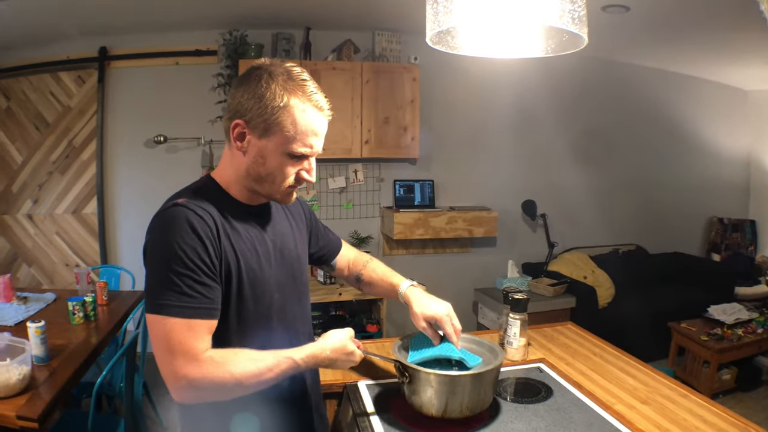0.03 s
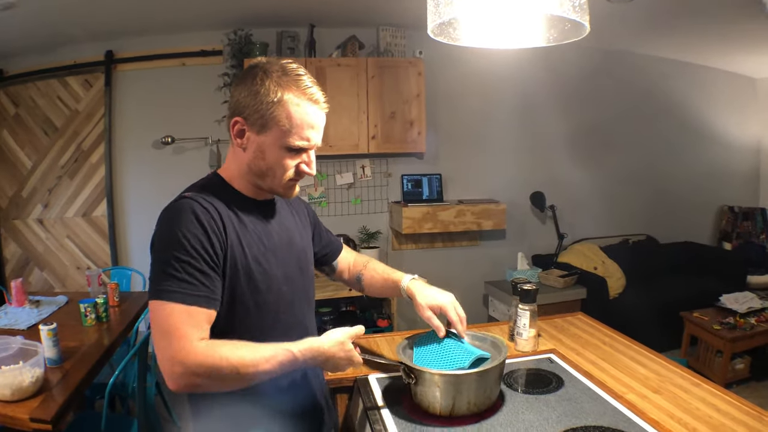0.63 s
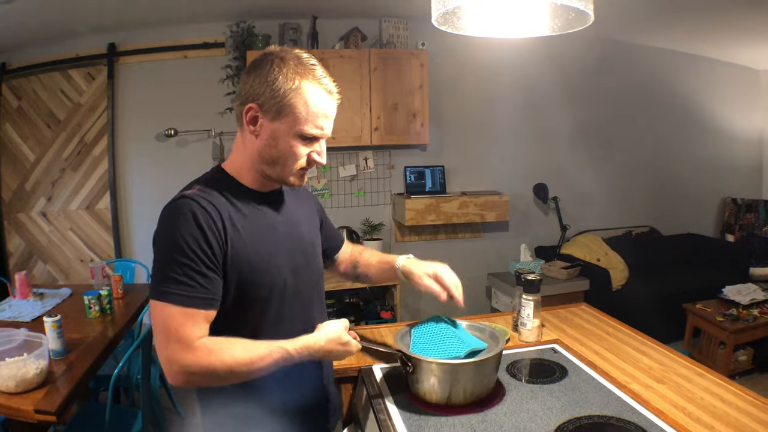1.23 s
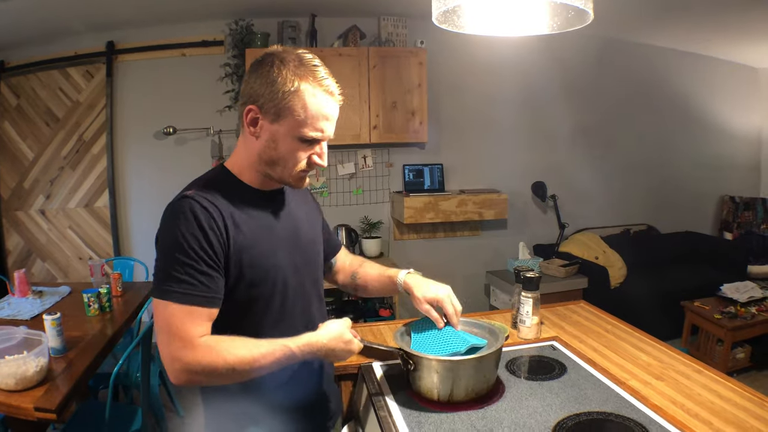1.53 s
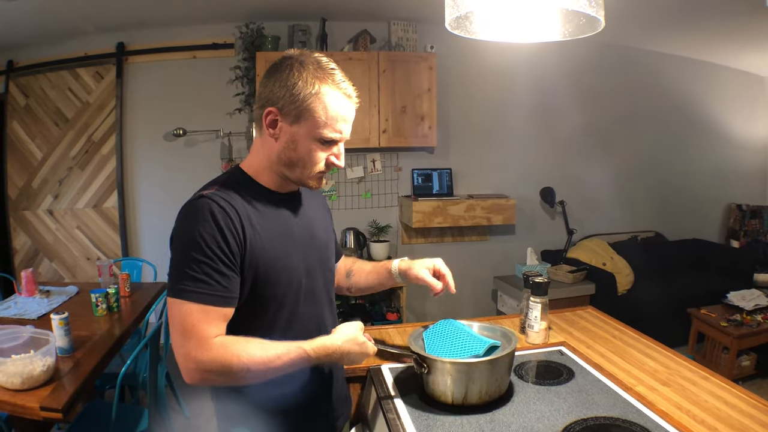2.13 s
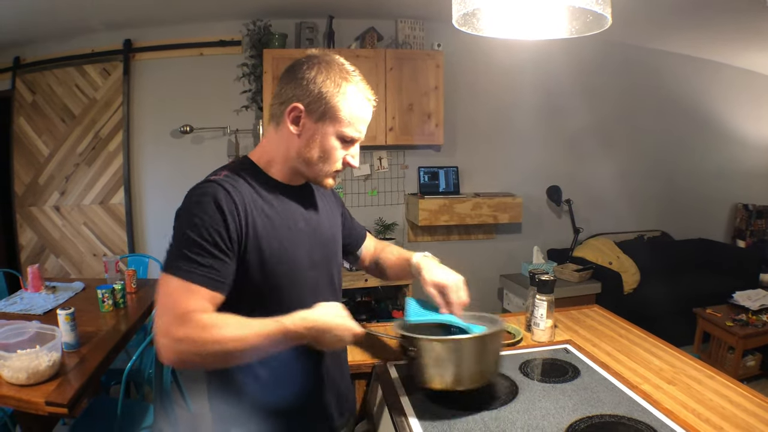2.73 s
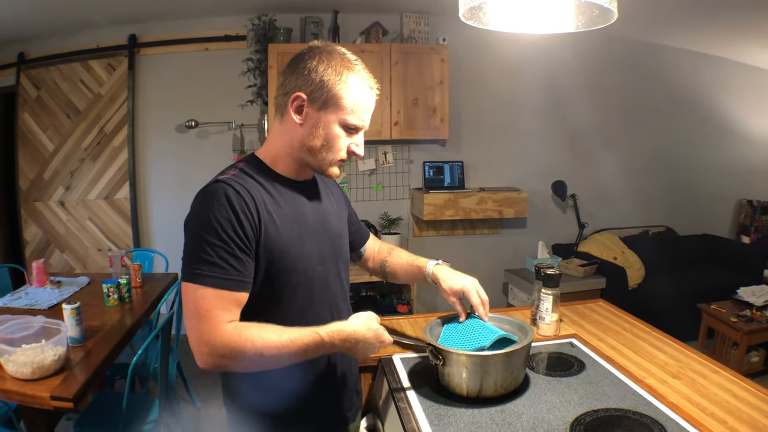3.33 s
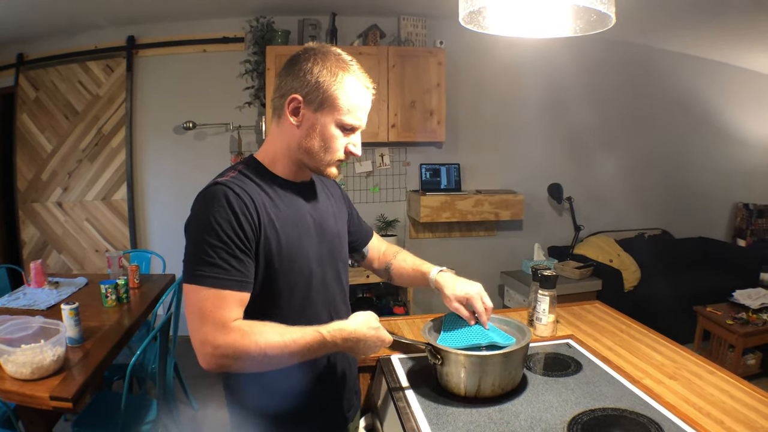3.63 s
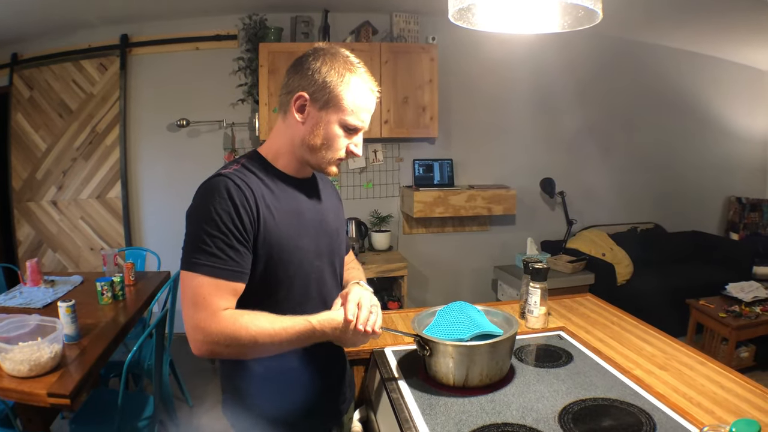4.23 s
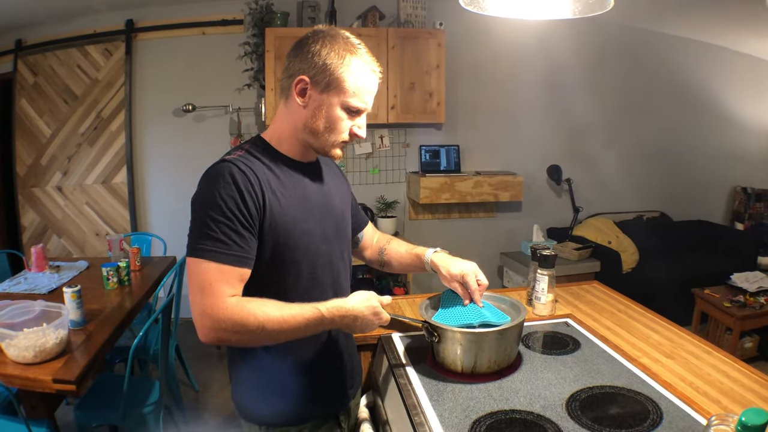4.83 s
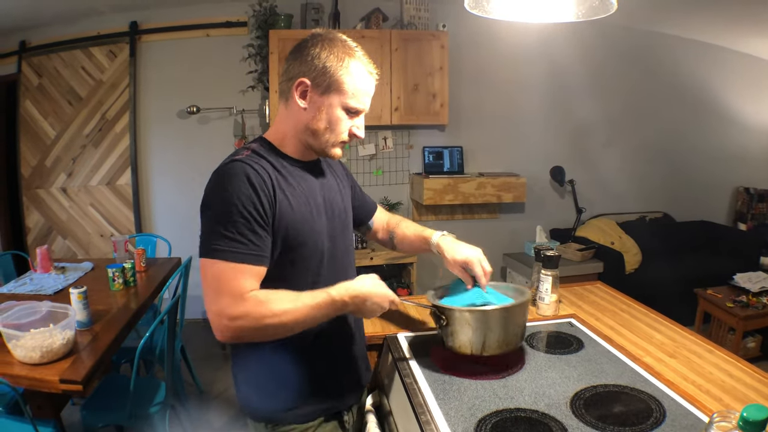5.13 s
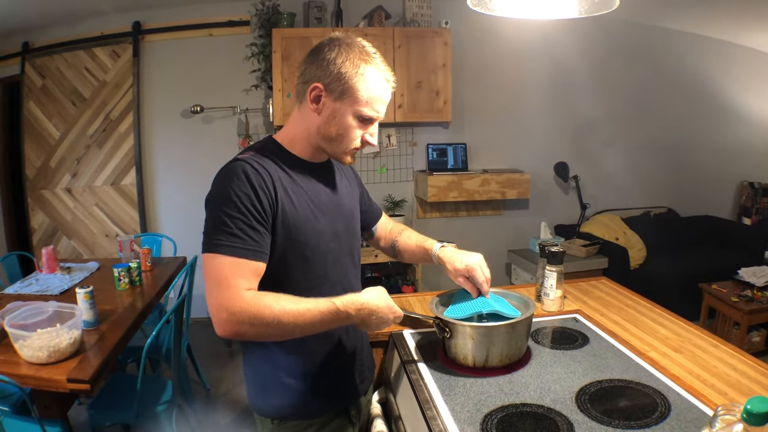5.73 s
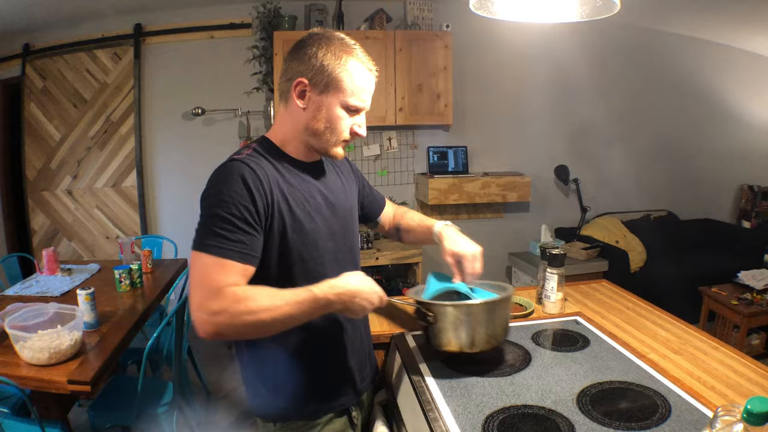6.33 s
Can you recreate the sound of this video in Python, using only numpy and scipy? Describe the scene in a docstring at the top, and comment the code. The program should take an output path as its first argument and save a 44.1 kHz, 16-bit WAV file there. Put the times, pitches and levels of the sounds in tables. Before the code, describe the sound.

Popcorn pops in a covered steel pot in a home kitchen, a rapid, irregular crackle of short snaps and soft puffs lasting the whole six and a half seconds. In the first 0.3 seconds a cluster of dull blows, the loudest moment, booms in the pot and rumbles the stove. Weaker thuds come at about 1.2 and 3 seconds. The pot is shaken roughly once a second, its base rasping over the glass top. The lid clanks brightly with the shakes from 0.8 to 1 second, from 1.7 to 2.1, around 2.9, and once more lightly near 3.9. Softer scrapes without clanks follow at about 5.1 and from 6.1 seconds to the end. Beneath the popping, oil sizzles faintly, split hulls sputter steam and the heap of corn rustles, over a steady low rumble of the house.

```python
"""Popcorn pops in a covered steel pot on a glass stove top in a home kitchen.
Each kernel tears open with a short crackle and a puff of steam that rings the air under the lid.
The pot is shaken about once a second: it scrapes and the lid clanks. A few dull blows boom in the pot
and rumble the stove's frame. Pops, blows and strokes stir the corn over the sizzling oil;
split hulls leak steam, the heap rustles, and the house rumbles low throughout."""
import sys
import numpy as np
from scipy import signal
from scipy.fft import rfft, irfft
from scipy.io import wavfile
from scipy.ndimage import uniform_filter1d

SR = 44100
rng = np.random.default_rng(int(sys.argv[2]) if len(sys.argv) > 2 else 0)


def persist_wave(psi):
    """Save psi, clipped to +-1, as 16-bit WAV."""
    counts = np.round(np.clip(psi, -1, 1) * 32767).astype(np.int16)
    wavfile.write(sys.argv[1], SR, np.atleast_2d(counts).T)


N = 285761
T = np.arange(8192) / SR  # time axis of one event, s
LEAD_S = .006  # tear before a pop, grind before a clank

# kernel bursts: t/s, crack/dB, treble re crack/dB, puff/dB, knock f/Hz
POPS = [(0.1532, -50, -5, -36, 1120), (0.1725, -51, 6, -32.5, 2500), (0.2705, -44.5, -11, -37, 980),
        (0.3178, -43.5, -11.5, -31, 1130), (0.382, -45.5, -4, -34.5, 2170), (0.4141, -38, -12, -33, 1120),
        (.473, -47.5, -16, -55, 3230), (0.5493, -46, -14, -36.5, 1170), (.609, -43.5, -9.5, -39.5, 1290),
        (0.647, -49, -15, -78, 1284), (0.6963, -57, -8, -43, 1670), (0.761, -45.5, -26, -40, 1500),
        (0.795, -41, -15, -33.5, 3660), (0.8732, -36, -23, -37, 1590), (1.0141, -42, -17, -37, 1260),
        (1.0442, -50, -12, -64, 1240), (1.111, -53.5, -8, -43, 1970), (1.1439, -47, -9.5, -42.5, 1360),
        (1.211, -51.5, -3.5, -41, 2540), (1.2835, -46.5, -10.5, -41.5, 1360),
        (1.3281, -52.5, -2.5, -45, 1190), (1.4217, -45, -13, -35.5, 1280), (1.452, -47.5, -12, -41, 3430),
        (1.468, -49, -12, -43, 3240), (1.4893, -47, -12, -41, 1280), (1.5259, -58, -10, -37.5, 2560),
        (1.564, -57, -8, -52, 1300), (1.5945, -47.5, -6, -40.5, 2880), (1.6341, -45.5, -15, -39.5, 1000),
        (1.6497, -51, -9, -37.5, 1530), (1.873, -48, -16, -36.5, 1410), (1.996, -51, -5, -33.5, 1100),
        (2.021, -49, -16, -44, 1500), (2.079, -57, -6, -44, 2600), (2.0919, -45, -16, -38.5, 2900),
        (2.153, -57, -4.5, -59, 2710), (2.178, -53, -6.5, -38.5, 2770), (2.2375, -53.5, -20, -47, 1070),
        (2.258, -51.5, -9, -37.5, 2720), (2.299, -48, -11.5, -40.5, 1300), (2.3234, -52, -14, -44, 3470),
        (2.3394, -50.5, -6, -47, 3380), (2.365, -47.5, -10, -41.5, 1330), (2.431, -53, -5, -45, 1700),
        (2.5156, -47.5, -17, -45, 1560), (2.5329, -43.5, -19, -46.5, 1146), (2.595, -53.5, -10, -42, 1820),
        (2.627, -46, -11, -36.5, 2570), (2.656, -59, -12, -47, 1510), (2.7037, -42.5, -15, -40, 1710),
        (2.726, -44.5, -14, -41, 1190), (2.744, -49.5, -8, -40, 1510), (2.7628, -47, -15, -43, 1270),
        (2.789, -40, -13, -36.5, 1640), (2.808, -55, -1, -40.5, 2580), (2.855, -40, -19, -40, 1520),
        (2.922, -41, -18, -35.5, 1310), (3.0, -51, -11, -51, 2320), (3.041, -44, -16, -41, 970),
        (3.063, -48, -11, -46, 3500), (3.0832, -50.5, -7, -61, 3050), (3.1095, -49, -24, -37, 2750),
        (3.1216, -51, -2.5, -42, 2170), (3.145, -57, -35, -54, 1340), (3.187, -48, -3.5, -42.5, 3250),
        (3.29, -53, -12, -39.5, 1250), (3.306, -39.5, -16, -40, 1270), (3.343, -53, -4.5, -39, 3370),
        (3.3737, -62, 2, -43, 3240), (3.399, -57, -7, -43.5, 2860), (3.408, -48, -8, -43, 1160),
        (3.4371, -53, -1, -70, 2650), (3.4997, -49.5, -7.5, -38.5, 2900), (3.538, -49.5, -8, -37.5, 2700),
        (3.5514, -48, -8, -36, 1160), (3.601, -57, -4, -40.5, 1410), (3.6196, -54.5, -10, -44.5, 2120),
        (3.6747, -46.5, -14, -46, 1470), (3.771, -57, -8, -48, 1230), (3.8343, -45, -29, -41, 1560),
        (3.9088, -54.5, -9, -54, 1220), (3.942, -50.5, -11, -39, 1440), (3.993, -61.5, 2, -66, 1900),
        (4.0093, -51, -4, -38.5, 3200), (4.025, -52.5, -27, -37.5, 2520), (4.0746, -49, -10, -39.5, 2060),
        (4.098, -50, -7, -38, 2470), (4.128, -50.5, -7, -48, 1720), (4.15, -46, -6, -42.5, 2830),
        (4.1898, -55, -26, -45, 1830), (4.206, -54.5, -12, -57, 2870), (4.3197, -50.5, -12, -42.5, 3230),
        (4.3426, -49, -10.5, -43, 1190), (4.3718, -56.5, -5, -39.5, 3250), (4.444, -50, -13, -40, 1280),
        (4.4769, -45.5, -9, -40.5, 1330), (4.5006, -45, -11, -40, 3070), (4.5505, -56, -9, -49, 2300),
        (4.6, -45, -11, -37.5, 1270), (4.618, -48, -14, -44, 2900), (4.644, -54, -10, -55, 2820),
        (4.6727, -53, -10, -41.5, 1410), (4.7012, -51, -8, -40, 3050), (4.728, -54.5, -12, -43, 1200),
        (4.7776, -45.5, -16, -39.5, 1280), (4.8121, -48, -15, -46, 1160), (4.833, -52, -11, -43, 1140),
        (4.85, -55, -10, -43.5, 1610), (4.912, -50.5, -13, -42.5, 2610), (4.9657, -52.5, -2.5, -50, 2750),
        (5.0528, -53, -4.5, -49, 3260), (5.095, -44.5, -11, -38.5, 1550), (5.1664, -46, -19, -44.5, 3070),
        (5.199, -59.5, -2, -47, 1260), (5.265, -54, -15, -39.5, 1310), (5.3606, -48, -6.5, -39, 1950),
        (5.397, -45.5, -21, -39.5, 1070), (5.4222, -57.5, 1, -42.5, 1820), (5.4297, -46, -12, -37.5, 2200),
        (5.488, -54, -3.5, -42.5, 1470), (5.5011, -46.5, -23, -49, 1900), (5.537, -45.5, -19, -36.5, 1150),
        (5.557, -58, -14, -47, 2820), (5.569, -52, -12, -45, 3080), (5.6158, -45, -26, -39.5, 1100),
        (5.65, -52.5, -9, -47, 2920), (5.7195, -51.5, -9.5, -41, 1290), (5.7462, -57.5, -12, -52, 2840),
        (5.79, -53.5, 1, -55, 3300), (5.806, -40, -17, -35, 1360), (5.8523, -49, -15, -48, 1280),
        (5.9037, -47.5, -14, -42.5, 1270), (5.9704, -55.5, -7, -45, 1860), (6.0028, -51, -5, -44, 2890),
        (6.0698, -48.5, -11, -37.5, 1240), (6.0889, -55.5, -6, -45, 1380), (6.1773, -49, -13, -49, 910),
        (6.204, -52, -19, -51, 1600), (6.2206, -60.5, 2, -43, 1280), (6.2536, -48, -15, -38.5, 1600),
        (6.3902, -46.5, -11, -38, 3920), (6.418, -53, -9, -39, 2300), (6.449, -53, -1.5, -49, 3660)]
# dull blows under the lid: t/s, crack/dB, treble re crack/dB, boom/dB, body/dB, body f/Hz
THUDS = [(0.0436, -38.5, -15, -29.5, -36, 410), (0.0523, -25.5, -13.5, -16, -22, 470),
         (.082, -36.5, -16, -24, -51, 775), (0.212, -43, -11, -25.5, -32.5, 626),
         (0.253, -42, -7, -27, -41, 497), (1.2268, -34, -20, -33, -35, 566),
         (3.028, -42.5, -13.5, -35.5, -37.5, 550)]
# pushes and pulls of the pot: peak t/s, length/s, level/dB
STROKES = [(0.823, 0.16, -40), (0.911, 0.39, -41.5), (1.085, 0.15, -49), (1.679, 0.19, -39.5),
           (1.82, 0.11, -37), (1.929, 0.22, -42), (2.058, 0.062, -41.5), (2.787, 0.33, -42.5),
           (2.943, 0.25, -44.5), (3.851, 0.13, -44), (5.102, 0.078, -43), (5.163, 0.064, -50),
           (5.265, .08, -46), (6.104, 0.057, -47), (6.229, 0.19, -49.5), (6.428, 0.25, -51)]
# spectra of hull crack, steam fizz, air puff and steel scrape: f/Hz, level/dB
CRACK = [(200, -50.5), (420, -2.5), (560, -16), (720, -12.5), (830, -6), (950, -2.5), (1200, 3.5),
         (1600, 0), (2100, -1), (2750, -1), (3400, 0), (4400, -9), (5600, -25), (8000, -58.5)]
FIZZ = [(3000, -9), (5200, 3), (6600, 3), (7300, 2), (8100, -0.5), (9800, -2), (11500, -4), (12600, -9.5),
        (14500, -10), (16000, -30)]
PUFF = [(40, -57), (110, -12.5), (180, -2), (245, 1), (320, -4), (400, -17), (600, -25), (1200, -63)]
SCRAPE = [(250, -26), (480, -4.5), (650, -4.5), (810, 6.5), (950, -7.5), (1080, -13.5), (1400, -5),
          (1570, -11), (1850, -8), (2300, -8), (2900, -28), (3450, -22), (4400, -24), (9000, -69)]


def amp(db):
    """Decibels to gain."""
    return 10 ** (np.asarray(db) / 20)


def unit(x):
    """Scale to rms 1."""
    return x / np.sqrt(np.mean(x ** 2) + 1e-20)


def struck(x, db, attack_s=.01):
    """Scale a blow so its attack has the given rms level."""
    return x * amp(db) / np.sqrt(np.mean(x[:int(attack_s * SR)] ** 2) + 1e-20)


def read(points, hz):
    """Interpolate a table over log frequency."""
    f, value = np.transpose(points)
    return np.interp(np.log(hz + 1), np.log(f + 1), value)


def add(mix, s, sound):
    """Mix a sound in at s seconds."""
    part = mix[max(round(s * SR), 0):][:len(sound)]
    part += sound[:len(part)]


def colour(x, spectrum, size=2048):
    """Minimum-phase filter along the last axis."""
    log_gain = np.log(amp(read(spectrum, abs(np.fft.fftfreq(size, 1 / SR)))))
    taps = np.fft.ifft(np.exp(np.conj(signal.hilbert(log_gain)))).real
    taps = taps.reshape((1,) * (x.ndim - 1) + (-1,))
    return signal.fftconvolve(x, taps, axes=-1)[..., :x.shape[-1]]


def highpass(x, hz):
    """Second-order low cut."""
    return signal.sosfilt(signal.butter(2, hz, "highpass", fs=SR, output="sos"), x)


def grains(per_s, spread_db):
    """Random train of tiny clicks of uneven size."""
    size = amp(spread_db * np.minimum(rng.exponential(1, N), 4))
    return unit(size * rng.standard_normal(N) * (rng.random(N) < per_s / SR))


def clumped(x, clump_db, size=130):
    """Break a hiss into snaps about size samples long."""
    lumps = uniform_filter1d(uniform_filter1d(rng.standard_normal(x.shape), size), size)
    return x * amp(clump_db * np.clip(unit(lumps), -2, 2))


def swells(rows):
    """Envelope of Hann bumps; rows: peak t/s, length/s, level/dB."""
    out = np.zeros(N)
    for s, length_s, db in rows:
        add(out, s - length_s / 2, amp(db) * np.hanning(int(length_s * SR)))
    return out


def hollow(x, hz, width_hz):
    """One short resonance of a gap in the corn or a slit in a hull."""
    return signal.fftconvolve(x, np.sin(2 * np.pi * hz * T) * np.exp(-np.pi * width_hz * T))[:len(x)]


def house_rumble(level_db=-49):
    """Low steady background of the house."""
    # background spectrum: f/Hz, level/dB
    spectrum = [(10, -9), (25, -7.5), (42, -0.5), (62, -9.5), (100, -14.5), (200, -18), (400, -26),
                (1000, -34), (4000, -46.5), (16000, -72)]
    gain = amp(read(spectrum, np.fft.rfftfreq(N, 1 / SR)))
    return amp(level_db) * unit(irfft(rfft(rng.standard_normal(N)) * gain, N))


def stirred(jolts, stir_db, settle_s):
    """Power of the corn's motion: jumps at each jolt (t/s, level/dB), then decays."""
    kicks = np.zeros(N)
    for s, db in jolts:
        add(kicks, s, amp([db + stir_db]) ** 2)
    return signal.lfilter([1], [1, -np.exp(-2 / (settle_s * SR))], kicks)


def simmer(oil_db=-73, sizzle_db=2, fizz_db=-14, murmur_db=2.5, tick_s=.0025):
    """Oil spits steadily; jolted corn ticks against the wall and stirs the air in the pot."""
    by_pops = stirred([(s, db) for s, db, *_ in POPS], stir_db=-5.5, settle_s=.018)
    by_strokes = stirred([(s, db) for s, _, db in STROKES], stir_db=-11, settle_s=.02)
    by_thuds = stirred([(s, db) for s, _, _, db, _, _ in THUDS], stir_db=-30.5, settle_s=.17)
    motion = np.sqrt(amp(oil_db) ** 2 + by_pops + by_strokes + by_thuds)
    tick_power = signal.fftconvolve(grains(per_s=1100, spread_db=1) ** 2, np.exp(-T / tick_s))[:N]
    ticks = np.sqrt(abs(tick_power)) * rng.standard_normal(N)
    sizzle = amp(sizzle_db) * unit(colour(ticks, CRACK))
    fizz = amp(fizz_db) * unit(colour(clumped(ticks, clump_db=1.5), FIZZ))
    murmur = amp(murmur_db) * unit(colour(grains(per_s=400, spread_db=1), PUFF))
    return motion * (sizzle + fizz + murmur)


def slumps(gain_db=-6, squeak_db=-2):
    """The heap slumps: dry flakes rub over each other."""
    # rustles of the heap: peak t/s, length/s, level/dB
    rustles = [(.03, .06, -57), (.2, 0.35, -56), (.44, 0.38, -50.5), (1.52, 0.36, -55.5), (2.33, 1, -58),
               (3.39, 0.37, -61.5), (4.15, 0.23, -56.5), (4.37, 0.12, -53.5), (4.67, 0.27, -54)]
    rub = colour(grains(per_s=1200, spread_db=-6.5), CRACK)
    squeak = amp(squeak_db) * unit(hollow(rub, hz=3200, width_hz=900))
    return swells(rustles) * amp(gain_db) * (unit(rub) + squeak)


def cracks(count, fall_s, tail_db, tail_s, spiky):
    """A few sharp hull cracks, then weak scatter among the corn; one row per event."""
    noise, size = np.moveaxis(rng.standard_normal((count, len(T), 2)), 2, 0)
    varied_fall_s = fall_s * rng.uniform(.75, 1.35, (count, 1))
    envelope = np.exp(-T / varied_fall_s) + amp(tail_db) * np.exp(-T / tail_s)
    return noise * np.exp(spiky * size) * envelope


def thuds(push_db=3, push_hz=250, push_s=.0091, shudder_db=-9, shudder_s=.02):
    """A sharp hit and a heavy push of air; the pot's low modes boom and the stove top shudders."""
    # low modes of the pot on the stove: f/Hz, level/dB, t60/s
    low_modes = [(195, -40, 0.072), (230, 4, 0.1), (279, 7, 0.037), (428, -17, 0.093), (781, -12, 0.12),
                 (1160, -8.5, 0.041)]
    # stove top spectrum: f/Hz, level/dB
    stove_top = [(90, -58), (160, 14), (240, 7), (330, 11.5), (450, -17), (600, 5), (820, 1), (950, 3.5),
                 (1150, -1), (1500, -7), (3000, -45)]
    out = np.zeros(N)
    hits = cracks(len(THUDS), fall_s=.00023, tail_db=-1.5, tail_s=.0042, spiky=1)
    push = -amp(push_db) * np.sin(2 * np.pi * push_hz * T) * np.exp(-T / push_s)
    for (s, crack_db, treble_db, boom_db, body_db, body_hz), hit in zip(THUDS, hits):
        boom = sum(-amp(db - 60 * T / t60_s) * np.sin(2 * np.pi * hz * rng.uniform(1, 1.03) * T)
                   for hz, db, t60_s in low_modes)
        shudder = unit(colour(rng.standard_normal(len(T)), stove_top)) * np.exp(-T / shudder_s)
        crack = colour(hit, CRACK)
        add(out, s, struck(highpass(boom + push, hz=170), boom_db))
        add(out, s, amp(boom_db + shudder_db) * shudder)
        add(out, s, struck(crack, crack_db) + struck(colour(hit, FIZZ), crack_db + treble_db))
        add(out, s, struck(hollow(crack, body_hz, width_hz=275), body_db))
    return out


def stove_rumble(gain_db=-23, fade_s=.25):
    """The heavy blows set the stove's frame rumbling."""
    # frame spectrum: f/Hz, level/dB
    frame = [(10, -34), (28, 0), (62, -3), (95, -2), (160, -63), (500, -21), (2000, -49)]
    out, t = np.zeros(N), np.arange(SR) / SR
    for s, _, _, boom_db, _, _ in THUDS:
        rumble = unit(colour(rng.standard_normal(SR), frame))
        add(out, s, amp(boom_db + gain_db) * rumble * np.exp(-t / fade_s))
    return out


def puffs(count, air_hz, ring_s, scatter_db, scatter_s, pitch_spread):
    """A push rings the air under the lid; pitch varies with where it happens."""
    hz = air_hz * np.exp(pitch_spread * rng.standard_normal((count, 1)))
    ring = -np.sin(2 * np.pi * hz * T) * np.exp(-T / ring_s)
    scatter = colour(rng.standard_normal((count, len(T))) * np.exp(-T / scatter_s), PUFF)
    return highpass(unit(ring) + amp(scatter_db) * unit(scatter), hz=140)


def pops(usual_db=-48, halving_db=13, knock_db=-1, fizz_db=-1, whistle_db=-6, swell_s=.016):
    """A hull tears, then bursts: crack, hollow knock, steam whistling through the slit, puff."""
    out, count = np.zeros(N), len(POPS)
    excess_db = np.array(POPS)[:, 1:2] - usual_db
    fall_s = .004 / 2 ** (excess_db / halving_db)  # strong bursts end sooner
    snap = cracks(count, fall_s, tail_db=-17, tail_s=.014, spiky=.7)
    spit = clumped(cracks(count, fall_s=.004, tail_db=-10, tail_s=.011, spiky=.7), clump_db=2.5)
    air = puffs(count, air_hz=253.3, ring_s=.0091, scatter_db=-1.5, scatter_s=.0046, pitch_spread=.11)
    swell = np.exp(np.minimum(T - LEAD_S, 0) / swell_s) * (T < LEAD_S)
    tear = rng.standard_normal(snap.shape) * swell
    slits_hz = rng.uniform(5200, 14000, count)
    layers = zip(POPS, slits_hz, colour(snap, CRACK), colour(spit, FIZZ),
                 colour(tear, CRACK), colour(tear, FIZZ), air)
    for (s, db, treble_db, puff_db, knock_hz), slit_hz, crack, fizz, rip, hiss, puff in layers:
        knock = amp(knock_db) * unit(hollow(crack, knock_hz, width_hz=220))
        whistle = amp(whistle_db) * unit(hollow(fizz, slit_hz, width_hz=600))
        tear_db = min(-8 - .9 * (db - usual_db), 0) - 5  # strong bursts come more suddenly
        add(out, s - LEAD_S, amp(tear_db) * (struck(rip, db + 4.5) + struck(hiss, db + treble_db)))
        add(out, s - .001, struck(puff, puff_db))
        add(out, s, struck(unit(crack) + knock, db))
        add(out, s, struck(unit(fizz) + whistle, db + treble_db + fizz_db))
    return out


def leaks(fizz_db=-7):
    """A split hull sputters steam into the oil without bursting."""
    # steam leaks: peak t/s, length/s, level/dB
    sputters = [(.355, 0.038, -63), (.745, 0.028, -55), (.81, 0.047, -49), (1.08, 0.043, -57),
                (1.275, 0.011, -72), (1.34, 0.026, -53.5), (1.412, 0.023, -55), (1.725, 0.024, -65),
                (3.27, 0.017, -59), (3.465, 0.037, -58), (3.575, 0.032, -55), (3.645, 0.06, -61),
                (3.80, 0.054, -58.5), (4.045, 0.019, -51.5), (4.255, 0.022, -62), (4.415, 0.11, -63),
                (4.525, 0.025, -60), (4.88, .02, -63), (4.995, 0.025, -58.5), (5.115, .03, -53),
                (5.145, 0.022, -68), (5.30, 0.018, -72), (5.345, 0.019, -59), (5.875, 0.022, -67),
                (6.035, 0.015, -79), (6.355, 0.021, -62)]
    jet = clumped(rng.standard_normal(N), clump_db=4)
    fizz = amp(fizz_db) * unit(colour(jet, FIZZ))
    return swells(sputters) * (unit(colour(jet, CRACK)) + fizz + unit(colour(jet, PUFF)))


def steel(x, damping, contact_db, spread_db, spot_hz, favour_db, detune, damped_hz=7000):
    """Wall modes ring over the dry contact; the spot favours some and detunes them."""
    # wall and lid modes: f/Hz, base width/Hz, level/dB
    modes = [(825, 47, 0.5), (1054, 43, -4), (1537, 99, -1.5), (1653, 31, 2.5), (2286, 52, -1.5),
             (2636, 144, -3.5), (2834, 27, -13.5), (3195, 50, -6), (3478, 81, 1.5), (4026, 40, -12.5),
             (4340, 180, -10), (5230, 27, -8), (5700, 80, -20.5), (6280, 110, -13), (6820, 20, -8.5)]
    # dry contact spectrum: f/Hz, level/dB
    contact = [(200, -9), (450, 4.5), (800, 6), (1100, 7.5), (1550, 14), (2100, -0.5), (3400, 13),
               (4600, -33), (8000, -51)]
    ring = np.zeros(len(T))
    for hz, width_hz, db in modes:
        boost_db = favour_db * np.exp(-(np.log(hz / spot_hz) / .15) ** 2)
        gain = amp(db + boost_db + spread_db * rng.standard_normal()) * width_hz
        decay = np.exp(-np.pi * width_hz * damping * (1 + hz / damped_hz) * T)
        detuned_hz = hz * (1 + detune * rng.standard_normal())
        ring += gain * decay * np.sin(2 * np.pi * (detuned_hz * T + rng.random()))
    return unit(signal.oaconvolve(x, ring)[:len(x)]) + amp(contact_db) * unit(colour(x, contact))


def sliding(scrape_db=-3.5, ring_db=-3, fizz_db=-22):
    """The base rasps over the glass; the contact wanders among spots that ring the wall differently."""
    slips = grains(per_s=3000, spread_db=1.8)
    ring = sum(steel(clumped(slips, clump_db=5, size=700), damping=1, contact_db=-18, spread_db=2,
                     spot_hz=hz, favour_db=11, detune=.018) for hz in (800, 850, 900, 1550))
    scrape = amp(scrape_db) * unit(colour(slips, SCRAPE))
    fizz = amp(fizz_db) * unit(colour(slips, FIZZ))
    return swells(STROKES) * (scrape + amp(ring_db) * unit(ring) + fizz)


def clanks(fizz_db=-9, puff_db=-4, grind_db=-14, spiky=.64):
    """The lid grinds along the rim, then chatters: a square blow is sudden, a glancing one swells."""
    # lid blows: t/s, ring/dB, treble re ring/dB, boom/dB, rise/s, chatter/s, favoured f/Hz
    blows = [(0.8336, -21.5, -1, -23, 0.00069, .0045, 3040),
             (0.9191, -32.5, -13, -26.5, 0.0014, .011, 1480),
             (0.984, -29.5, -5.5, -26, 0.0012, 0.0073, 2880),
             (1.6785, -32.5, -1, -33.5, 0.0039, 0.0079, 3500), (1.6882, -32, -20, -34, 0.0016, 0.006, 850),
             (1.751, -36.5, -5, -34, 0.002, 0.0031, 1650), (1.799, -43.5, 0, -38, 0.0013, 0.0021, 850),
             (1.8276, -41, -9, -30, 0.0034, 0.0058, 1520),
             (1.8906, -26.5, -2, -27.5, 0.00067, 0.0074, 4130),
             (1.953, -31.5, -5, -33.5, 0.0059, 0.0041, 1650),
             (2.0524, -42.5, -2, -33, 0.0011, 0.0025, 1100),
             (2.8727, -29.5, -7.5, -32.5, 0.00054, 0.0092, 1550),
             (2.944, -30, -20, -32, 0.0013, 0.0043, 3500), (3.8527, -34.5, -8, -34, 0.00056, 0.0048, 865)]
    out = np.zeros(N)
    air = puffs(len(blows), air_hz=263, ring_s=.0083, scatter_db=-2, scatter_s=.015, pitch_spread=.093)
    for (s, db, treble_db, boom_db, rise_s, chatter_s, hz), puff in zip(blows, air):
        noise, size = rng.standard_normal((2, len(T)))
        envelope = (1 - np.exp(-T / rise_s)) ** 2 * np.exp(-T / chatter_s)
        hit = noise * np.exp(spiky * size) * envelope
        ring = steel(hit, damping=1.15, contact_db=-4, spread_db=3, spot_hz=hz,
                     favour_db=4, detune=.0077)
        fizz = struck(colour(hit, FIZZ), db + treble_db + fizz_db)
        add(out, s, struck(ring, db) + fizz + struck(puff, boom_db + puff_db))
        grind = rng.standard_normal(len(T)) * T * (T < LEAD_S)
        add(out, s - LEAD_S, struck(colour(grind, SCRAPE), db + grind_db))
    return out


def covered_pot(x):
    """The closed pot rings along with all that sounds in it."""
    # air, wall and lid resonances: f/Hz, width/Hz, level/dB
    modes = [(429.4, 8.5, -6.5), (867, 42, -16), (3220, 43, -41), (4930, 23, 3.5), (6120, 33, -6.5),
             (6400, 24, -2.5), (6890, 32, -12.5), (8070, 70, 4.5), (9100, 130, -16), (10500, 89, -36),
             (11140, 100, -5)]
    ring = sum(amp(db) * 2 * np.pi * width_hz / SR * np.exp(-np.pi * width_hz * T)
               * np.cos(2 * np.pi * hz * T) for hz, width_hz, db in modes)
    return x + signal.fftconvolve(x, ring)[:N]


def kitchen(x, wet_db=-16.5, size=256):
    """Sparse reflections, each band decaying at its own rate."""
    # room decay: f/Hz, t60/s
    decay_times = [(150, 0.46), (500, .3), (2000, 0.1), (6000, 0.15), (15000, 0.14)]
    taps = rng.standard_normal(SR // 2) * (rng.random(SR // 2) < .08)
    taps[:size * 2] = 0  # pre-delay
    hz, t, bands = signal.stft(taps, SR, nperseg=size)
    decay = amp(-60 * t / read(decay_times, hz)[:, None])
    tail = signal.istft(bands * decay, SR, nperseg=size)[1]
    return x + amp(wet_db) * signal.fftconvolve(x, tail / np.linalg.norm(tail))[:N]


def scene():
    """The pot in the kitchen over stove and house rumble; mono."""
    pot = covered_pot(pops() + clanks() + thuds() + sliding() + leaks() + slumps() + simmer())
    return (kitchen(pot) + stove_rumble() + house_rumble())[None]


def record(dry):
    """Steep low-pass."""
    edge_hz = 16100
    low_pass = signal.firwin(511, edge_hz, window=("kaiser", 9), fs=SR)
    return signal.oaconvolve(dry, low_pass[None], "same")


dry = scene()
out = record(dry)
persist_wave(out)
```